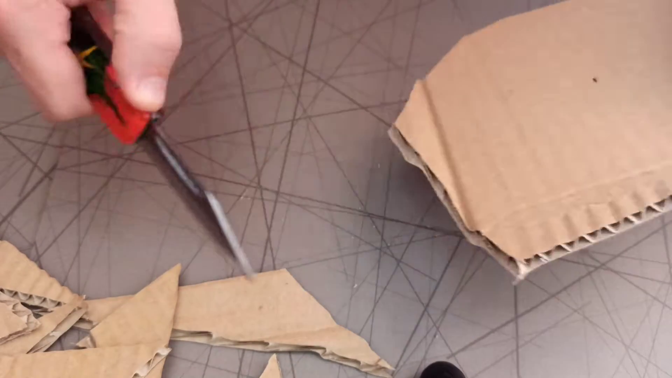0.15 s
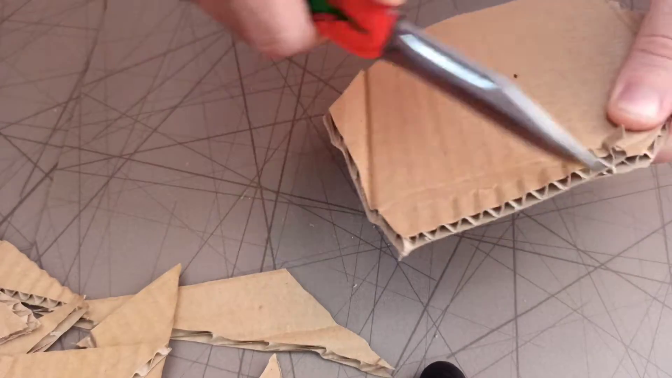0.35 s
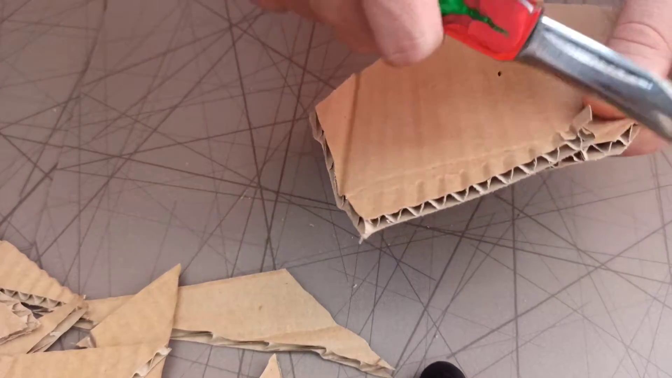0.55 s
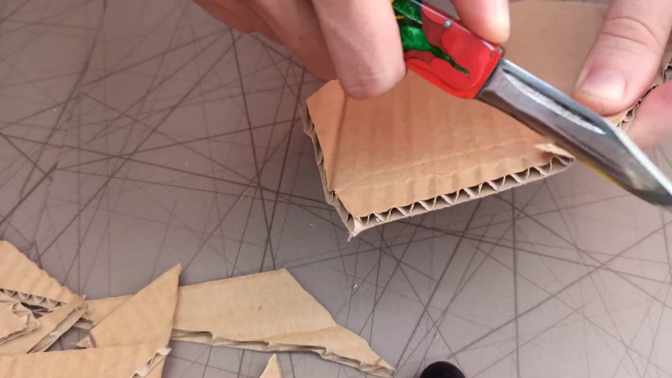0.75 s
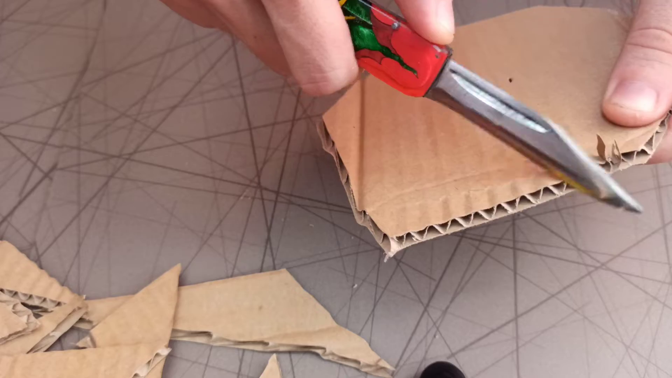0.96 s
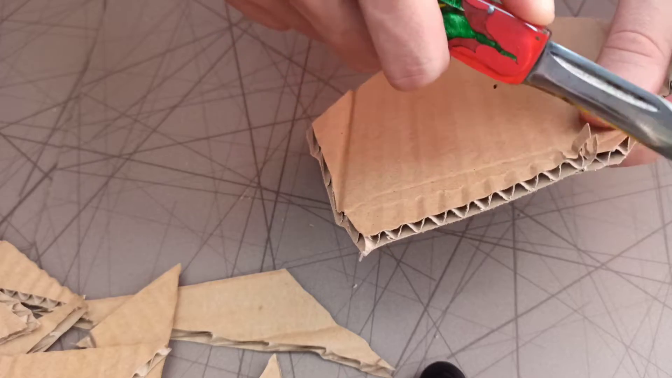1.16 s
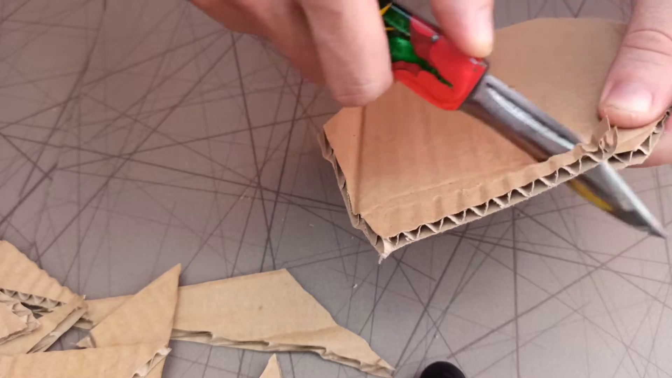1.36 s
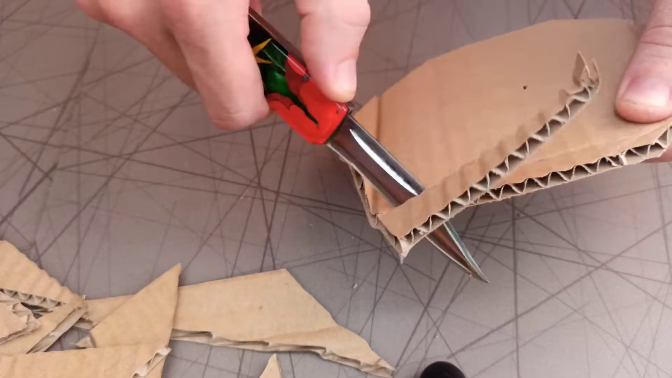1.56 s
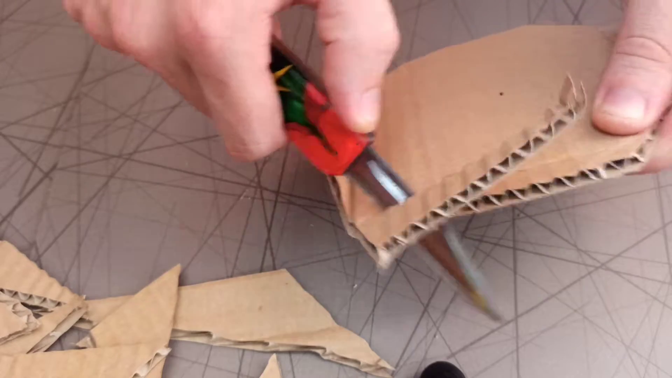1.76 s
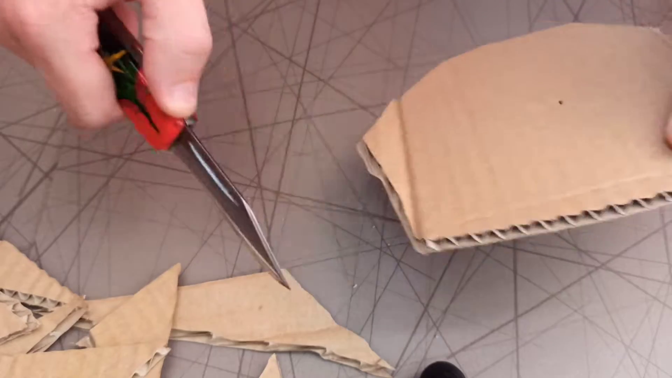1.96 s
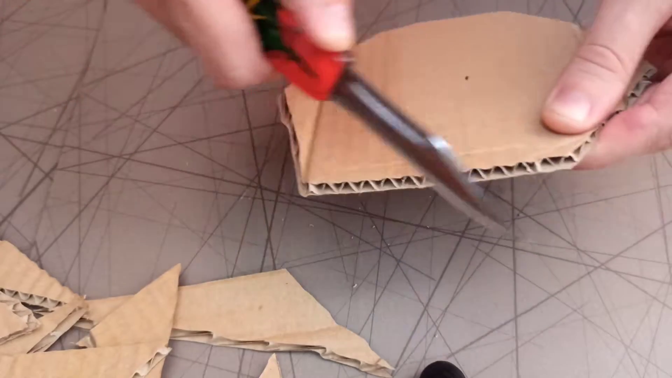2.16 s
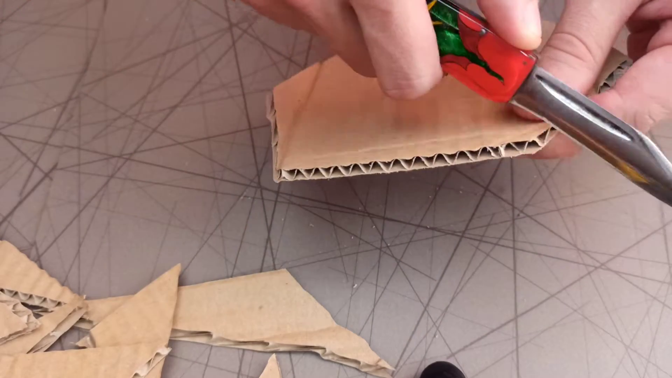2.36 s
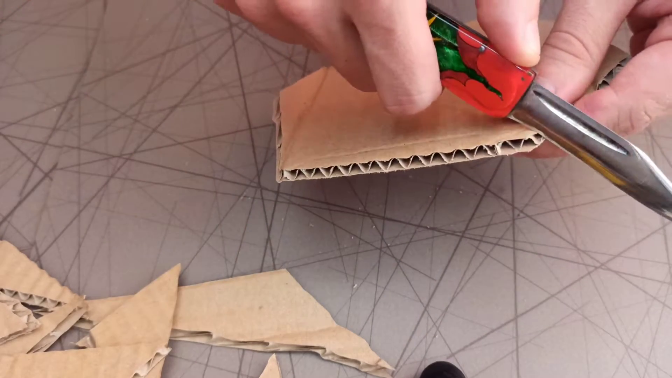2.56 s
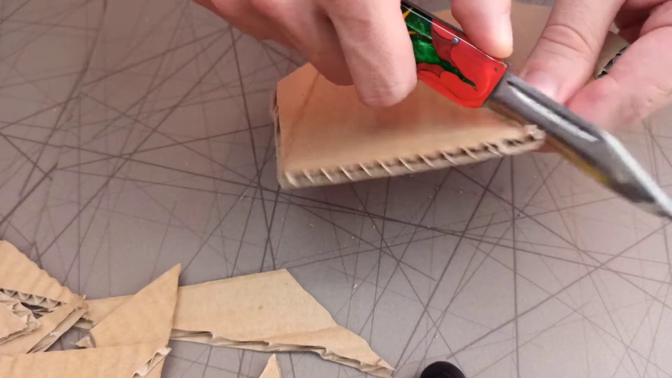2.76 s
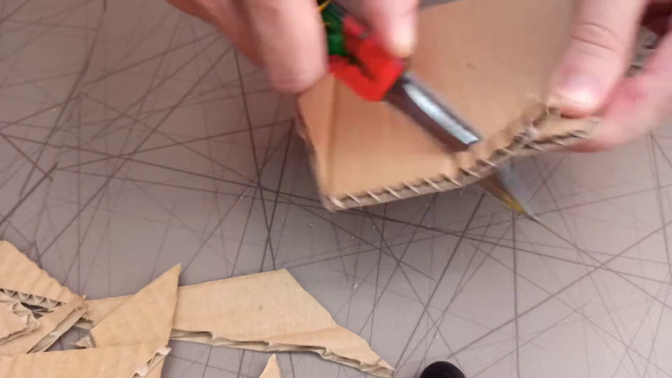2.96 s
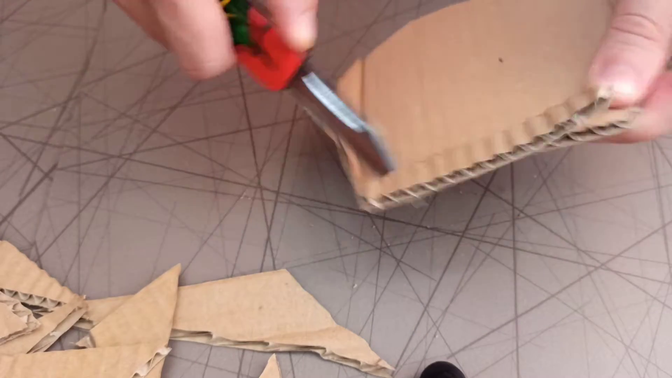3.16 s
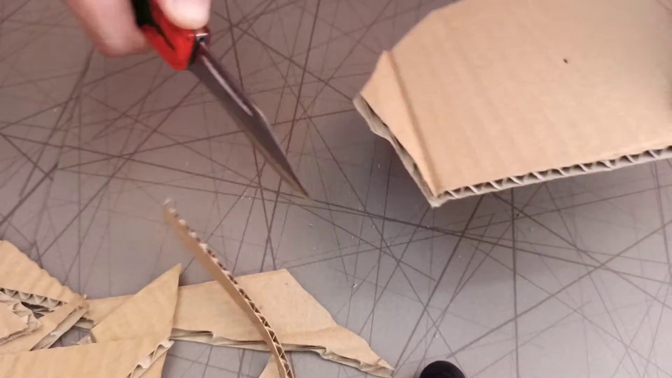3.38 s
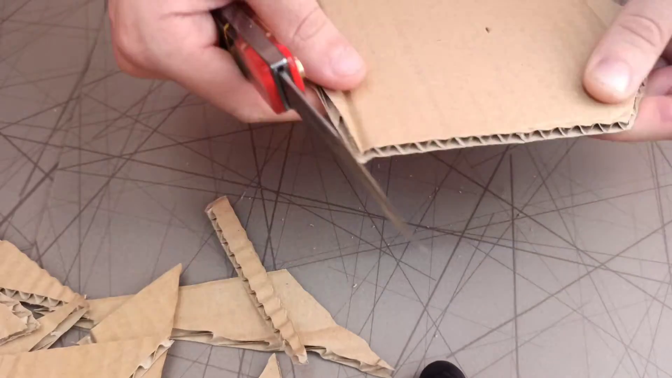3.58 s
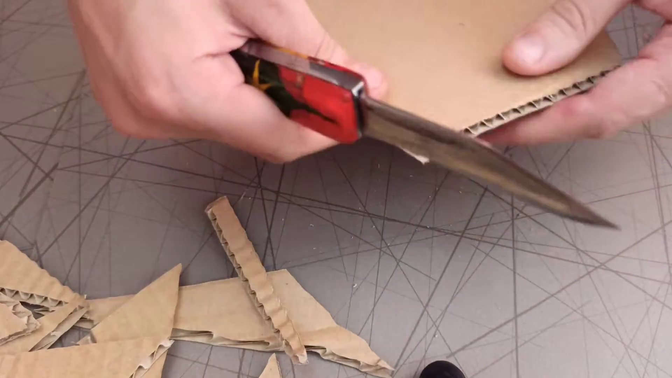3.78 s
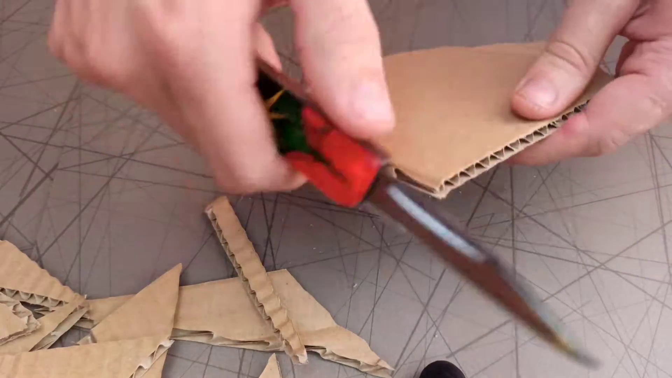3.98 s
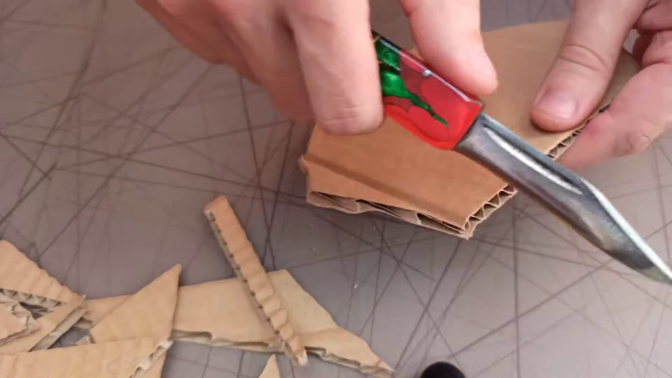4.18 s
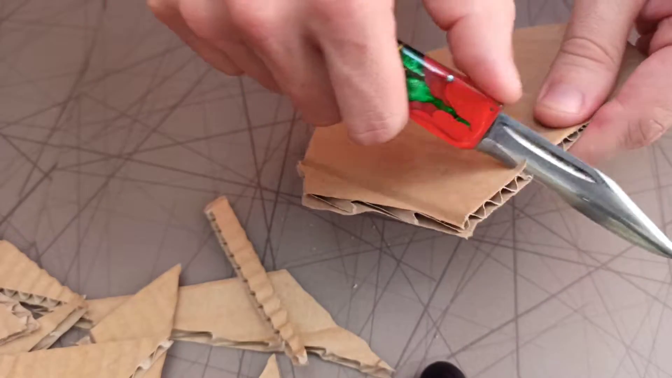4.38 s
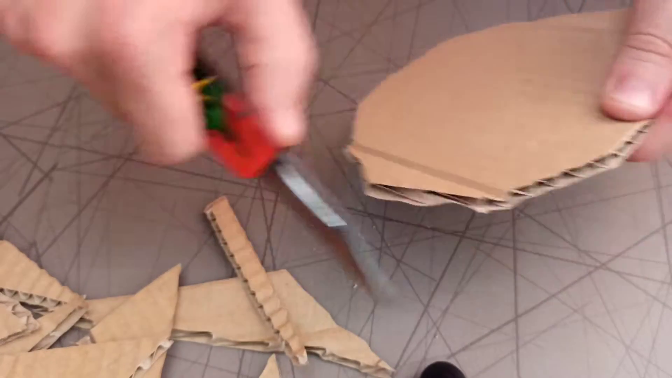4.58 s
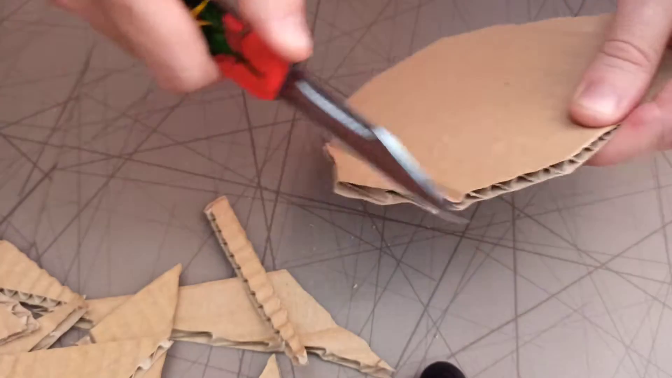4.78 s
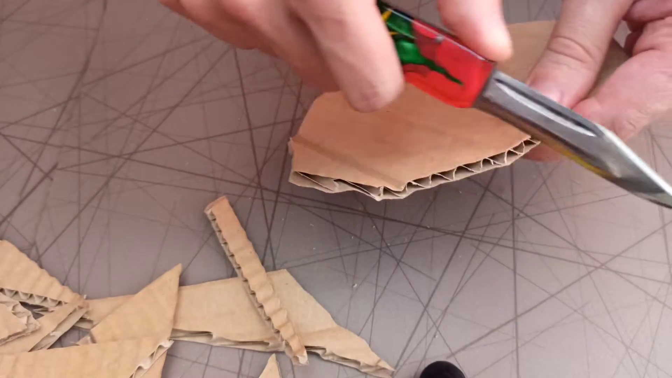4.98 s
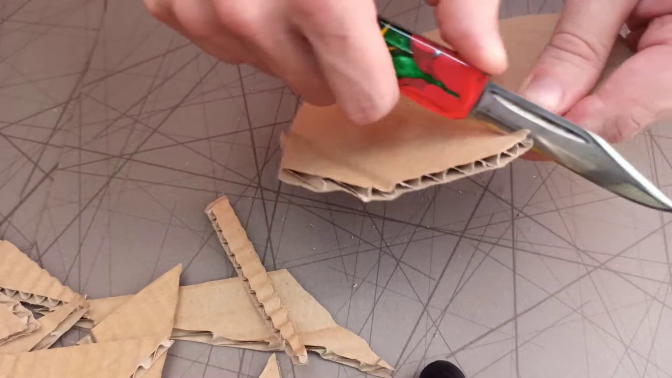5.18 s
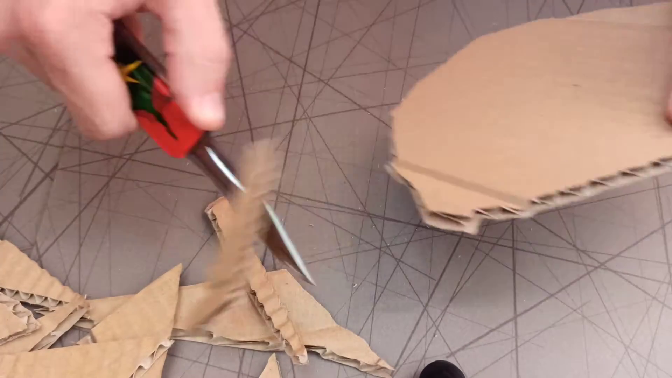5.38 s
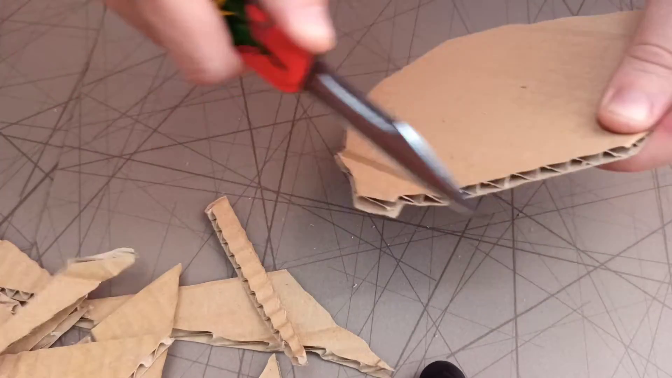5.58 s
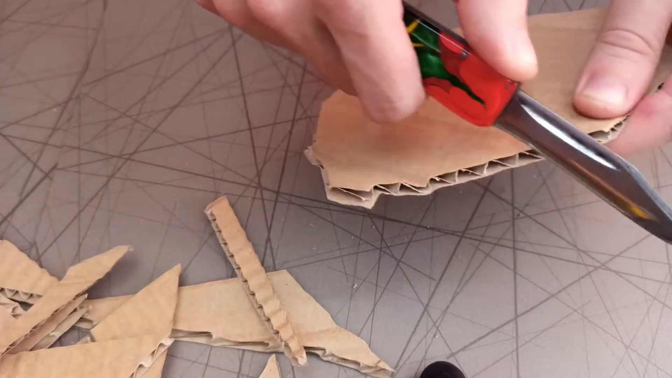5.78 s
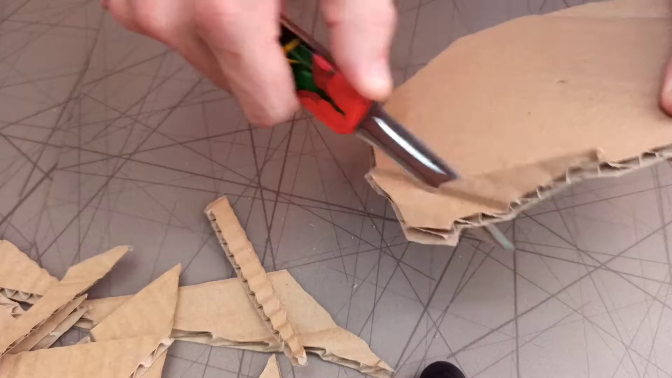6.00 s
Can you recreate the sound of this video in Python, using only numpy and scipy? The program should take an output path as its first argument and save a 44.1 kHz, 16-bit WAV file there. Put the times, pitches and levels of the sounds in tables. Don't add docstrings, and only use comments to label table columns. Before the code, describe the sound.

Cardboard is sliced by hand: dry, crackling rips with brittle pops and low hollow knocks, separated by quiet paper rubs and small ticks. Strokes cluster near the middle and grow longer and crunchier later, the last one still tearing as it ends. The sound is very close and bright with little bass, with short room reflections and a barely audible background hum, thin whine and far engine.

```python
import sys
import numpy as np
from scipy import signal
from scipy.fft import rfft, irfft, next_fast_len
from scipy.io import wavfile
from scipy.ndimage import uniform_filter1d

SR = 44100
rng = np.random.default_rng(int(sys.argv[2]) if len(sys.argv) > 2 else 0)


def bounce(signal):
    frames = np.transpose(np.atleast_2d(signal))
    limited = np.clip(frames, -1, 1)
    pcm = np.round(limited * 32767).astype(np.int16)
    wavfile.write(sys.argv[1], SR, pcm)


def volts_from_db(level):
    exponent = np.asarray(level, float) / 20
    return 10 ** exponent


N = 266364


def evened(x):
    return x / np.sqrt(np.mean(x ** 2) + 1e-20)


def read(points, hz):
    f, value = np.transpose(points)
    return np.interp(np.log(hz + 1), np.log(f + 1), value)


def coloured(x, points):
    size = next_fast_len(N)
    gain = volts_from_db(read(points, np.fft.rfftfreq(size, 1 / SR)))
    return irfft(rfft(x, size) * gain, size)[:N]


def without_bass(x, order, hz):
    return signal.sosfilt(signal.butter(order, hz, "high", fs=SR, output="sos"), x)


def ring(x, hz, width):
    r = np.exp(-np.pi * width / SR)
    return 2 * signal.lfilter([1 - r], [1, -r * np.exp(2j * np.pi * hz / SR)], x).real


def glide(curve, order, waver_db):
    s, hz, db = np.transpose(curve)
    t = np.arange(N) / SR
    waver = evened(uniform_filter1d(rng.standard_normal(N), 6000))
    level = np.sqrt(2) * volts_from_db(np.interp(t, s, db) + waver_db * waver)
    turns = order * np.cumsum(np.interp(t, s, hz)) / SR
    return level * np.sin(2 * np.pi * turns)


# start_s, pitch_hz, level_db (rms)
DRONE = [
    (0, 51, -78),
    (2.5, 48.5, -79),
    (2.9, 48, -84),
    (3.7, 48, -80),
    (4.1, 54, -72),
    (4.5, 57, -71),
    (4.75, 61, -71),
    (5.1, 53, -72),
    (5.4, 50, -84),
    (6.04, 50, -92),
]
# start_s, pitch_hz, level_db (rms)
WHINE = [(0, 4352, -81), (.5, 4348, -80), (1.3, 4350, -81), (2.3, 4362, -88), (3.7, 4355, -91),
         (4.2, 4355, -84), (5, 4352, -83), (6.04, 4350, -82)]


def machines():
    engine = glide(DRONE, order=1, waver_db=5.5) + volts_from_db(-1) * glide(DRONE, order=2, waver_db=-0.5)
    return engine + glide(WHINE, order=1, waver_db=1.5)


# pitch_hz, level_db
AIR = [(30, -30.5), (60, -8), (105, 1), (250, -7), (600, -11), (1200, -19), (2000, -25.5), (4500, -28),
       (7000, -23.5), (11000, -43), (16000, -35.5)]
# pitch_hz, level_db (rms)
HUM = [(624.5, -67.5)]


def air():
    t = np.arange(N) / SR
    out = volts_from_db(-62.5) * evened(coloured(rng.standard_normal(N), AIR))
    for hz, db in HUM:
        waver = evened(uniform_filter1d(rng.standard_normal(N), 9000))
        out += volts_from_db(db + 0.5 + 1.5 * waver) * np.sin(2 * np.pi * hz * t + 0.17 * waver)
    return out


# pitch_hz, t60_s
ROOM = [(200, 0.054), (800, 0.17), (2000, .18), (6000, 0.17), (14000, 0.12)]


def room(x):
    taps = np.zeros(SR // 2)
    at = np.arange(120, len(taps) - 20, 20)
    taps[at + rng.integers(0, 20, len(at))] = rng.choice([-1., 1.], len(at))
    hz, t, z = signal.stft(taps, SR, nperseg=256)
    t60 = np.clip(read(ROOM, hz), .03, 1)[:, None]
    tail = signal.istft(z * volts_from_db(-60 * t / t60), SR, nperseg=256)[1]
    return signal.oaconvolve(x, tail / np.linalg.norm(tail))[:N]


# start_s, level_db (peak), pitch_hz
THUDS = [(0.049, -39.5, 220), (1.078, -44, 197), (1.446, -50.5, 230), (2.799, -41.5, 244),
         (3.029, -47.5, 158), (3.168, -43.5, 150), (3.517, -42.5, 146), (4.036, -33.5, 216),
         (4.598, -51, 210), (2.97, -39.5, 228), (5.258, -53.5, 224), (5.301, -43, 262), (1.329, -47, 160)]


def thuds():
    out, t = np.zeros(N + 6000), np.arange(6000) / SR
    shape = (1 - np.exp(-t / 0.00046)) * np.exp(-t / 0.016)
    for s, db, hz in THUDS:
        out[round(s * SR):][:len(t)] += volts_from_db(db - 4.0) * shape * np.sin(2 * np.pi * hz * t)
    return out[:N]


# start_s, level_db (peak), pitch_hz
PLUCKS = [(.0585, -26, 640), (1.785, -19, 7730), (.729, -54, 630), (.739, -49, 670), (.7505, -47, 1630),
          (.816, -44, 4100), (1.041, -44, 2380), (1.0488, -47, 2280), (1.304, -51, 685),
          (0.7744, -31.5, 1010), (1.341, -52, 1160), (1.365, -55, 775), (1.391, -61, 1130),
          (1.412, -51, 1150), (1.433, -42, 415), (1.465, -49, 473), (1.602, -45, 1570), (1.6155, -43, 1390),
          (1.626, -43, 1037), (1.66, -44.5, 1300), (1.773, -40, 1080), (1.795, -46.5, 625),
          (1.813, -40.5, 615), (1.9325, -45, 738), (2.6457, -35, 4190), (2.656, -44, 580),
          (2.771, -34, 575), (2.798, -37.5, 3020), (2.804, -30, 766), (2.971, -31, 590),
          (2.981, -25.5, 652), (3.1445, -32, 630), (3.1815, -30, 635), (3.233, -53, 649),
          (3.521, -48, 1250), (3.559, -50.5, 474), (3.5805, -48.5, 1160), (3.862, -39.5, 1040),
          (4.4515, -47, 1400), (4.538, -25.5, 714), (5.249, -26.5, 716), (5.258, -26, 726),
          (5.304, -20, 546), (5.317, -28.5, 570), (5.344, -41, 646), (5.3765, -45.5, 732),
          (5.539, -52, 613), (5.5465, -44.5, 3760), (5.886, -32, 700), (5.911, -26.5, 744),
          (5.914, -24.5, 1550), (5.927, -32, 3725), (5.9343, -28, 3130), (5.949, -27, 840),
          (5.975, -30, 1830), (5.996, -27.5, 705), (6.0198, -32, 3530)]


def plucks():
    rise_s, ring_s, ring_cycles = 0.00043, 0.0026, 1.55
    out, t = np.zeros(N + 2000), np.arange(2000) / SR
    for s, db, hz in PLUCKS:
        shape = (1 - np.exp(-t / rise_s)) * np.exp(-t / (ring_s + ring_cycles / hz))
        out[round(s * SR):][:len(t)] += volts_from_db(db) * shape / shape.max() * np.sin(2 * np.pi * hz * t)
    return out[:N]


# start_s, level_db (peak), pitch_hz
KNOCKS = [(.0455, -9.5, 560), (.0458, -20.5, 1550), (.0488, -21, 730), (.0385, -28, 900),
          (3.8222, -24, 720), (4.0324, -17.5, 680), (4.0328, -21.5, 2500), (4.0326, -20, 4100),
          (2.9519, -10.5, 6700), (2.9422, -19.5, 1250), (2.9522, -23, 1200), (5.2342, -22, 3000),
          (5.298, -19, 3300), (2.9114, -13.5, 6600), (.7603, -19.5, 706), (3.141, -17, 7300),
          (3.1462, -14.5, 7400), (3.1455, -22, 800), (3.1635, -18, 7400), (1.7922, -18, 7600),
          (1.796, -21.5, 7600), (4.5098, -12.5, 6700), (2.012, -41, 6800), (2.0203, -46, 6300),
          (1.9355, -39, 3650)]


def knocks():
    swell_s, swell_cycles = 0.00051, .35
    out, t = np.zeros(N + 800), np.arange(800) / SR
    for s, db, hz in KNOCKS:
        u = t / (swell_s + swell_cycles / hz)
        out[round(s * SR):][:len(t)] -= volts_from_db(db) * (u * np.exp(1 - u)) ** 3 * np.sin(2 * np.pi * hz * t)
    return without_bass(out[:N], 2, 200)


def body(x, modes):
    return evened(sum((-1) ** k * volts_from_db(db) * ring(x, hz, w) for k, (hz, w, db) in enumerate(modes)))


def walls(drive, low_hz, high_hz, width, wander_db, count):
    hz = np.geomspace(low_hz, high_hz, count) * rng.uniform(0.8844, 1.04, count)
    near = rng.standard_normal((count, N // 64 + 1))
    near = uniform_filter1d(uniform_filter1d(near, 12, axis=1), 12, axis=1)
    near = np.repeat(volts_from_db(wander_db * evened(near)), 64, axis=1)[:, :N]
    return evened(sum(ring(ring(drive * g, f, width), f, width) for f, g in zip(hz, near)))


# pitch_hz, level_db
TEAR = [(4000, -15.5), (4700, -1.5), (6000, 4.5), (6700, -0.5), (7600, 0.5), (8400, 0), (11000, -16),
        (11600, -36)]
# pitch_hz, width_hz, level_db
FLUTES = [(1365, 38, 5), (2334, 200, 7), (3330, 1100, -1), (4460, 216, 9)]
# pitch_hz, width_hz, level_db
BOARD = [(450, 10, -0.5), (635, 36.5, 4.5), (870, 520, -9.5)]


def voices(drive):
    tear = evened(coloured(drive, TEAR)) + .7 * walls(drive, 6800, 8400, 300, 4, count=7)
    flute = body(drive, FLUTES) + .7 * walls(drive, 1100, 4300, 260, 3.2, count=12)
    board = body(drive, BOARD) + .8 * walls(drive, 360, 900, 100, 2.5, count=6)
    board = without_bass(board, 3, 280)
    fine = signal.sosfilt(signal.butter(8, 11400, "high", fs=SR, output="sos"), drive)
    return np.array([evened(v) for v in (tear, flute, board, fine)])


def breaks(events, rise, fall, ring_s, knock_s, fine_db):
    tear, flute, board, fine = voices(rng.standard_normal(N))
    out, t = np.zeros(N + 3000), np.arange(3000) / SR
    onset = 1 - np.exp(-t / rise)
    burst = onset * (np.exp(-t / fall) + 0.18 * np.exp(-t / .007))
    burst /= burst.max()
    swing = (1 - np.exp(-t / (rise + 0.00046))) * np.exp(-t / knock_s)
    for s, db, flute_db, knock_db, knock_hz, flute_hz in events:
        at = round(s * SR)
        here = np.minimum(at + np.arange(len(t)), N - 1)
        tone = onset * np.exp(-t / ring_s) * np.sin(2 * np.pi * flute_hz * t)
        ping = .45 * burst * flute[here] + .8 * tone
        upper = np.exp(-t / 0.0029) * np.sin(2 * np.pi * 1.776 * knock_hz * t)
        knock = swing * (np.sin(2 * np.pi * knock_hz * t) + upper + 0.41 * board[here])
        crack = burst * (tear[here] + volts_from_db(fine_db) * fine[here])
        sound = crack + volts_from_db(flute_db) * ping + volts_from_db(knock_db + 6.5) * knock
        out[at:at + len(t)] += volts_from_db(db) * sound
    return out[:N]


def walled(rows):
    board_knock_hz = 704
    return [(*row[:4], board_knock_hz, row[4]) for row in rows]


def faced(rows):
    face_flute_hz = 1522
    return [(*row, face_flute_hz) for row in rows]


# start_s, level_db (peak), flute_ring_db, flute_pitch_hz
TICKS = [(1.9336, -35, 4, 3600), (2.111, -24, -8, 3640), (3.344, -29.5, -5.5, 4000),
         (3.3517, -29.5, 1.5, 4420), (3.407, -39, 0.5, 4020), (3.5615, -35, -5, 4530),
         (3.928, -38.5, -4, 4140), (3.9535, -42, -3, 4600), (4.0328, -17, -2, 4090), (4.0716, -32, 2, 4150),
         (4.5992, -25.5, -7, 3830), (4.6952, -43, -12, 3900), (4.8353, -41.5, 0, 3000),
         (4.8435, -33.5, -2, 2600), (4.874, -36, -1.5, 3370), (4.902, -43.5, -7, 3930),
         (4.914, -43, -25, 4300), (5.001, -41, -20, 4600), (5.009, -54, -10, 4360),
         (5.05, -51.5, -10, 4400), (5.3767, -28.5, -26, 4700), (5.411, -29, -7, 4050),
         (5.54, -41.5, 4.5, 3980), (0.7398, -35, -17, 3880), (.7517, -41, -12, 4000),
         (0.8536, -45, -12, 4000), (1.4995, -42, -13, 4170), (2.235, -58, -17, 4020),
         (2.409, -56.5, -24, 4000), (2.7257, -39, -15, 4200), (3.168, -24, -14, 4330),
         (3.192, -38, -15, 4300), (3.933, -42, -6, 4250), (4.341, -41.5, -12, 4100),
         (4.453, -41, -12, 4100), (5.496, -56, -15, 4300), (5.826, -43.5, -15, 4000),
         (5.862, -46, -11, 4030), (5.882, -26, -20, 4090), (5.889, -20, -24, 4090), (2.756, -21, -16, 4250),
         (2.982, -17.5, -9, 4150), (3.1386, -16, -6, 2300)]


def ticks():
    light = [(s, db, flute_db, -np.inf, 0, hz) for s, db, flute_db, hz in TICKS]
    return breaks(light, rise=0.00008, fall=0.0014, ring_s=0.0027, knock_s=1, fine_db=-16.0)


# start_s, level_db (peak), flute_ring_db, board_knock_db, knock_pitch_hz
CREASES = [(0.7723, -33, 9, -3, 620), (.823, -35, 3, 5.5, 450), (.987, -52, -10, 13, 762),
           (1.036, -44, 8, -8, 960), (1.0552, -36.5, 3, 5.5, 454), (1.454, -60, -17, 15, 450),
           (1.7347, -45.5, -19, 8, 450), (2.042, -50, -23, -10, 420), (5.833, -31.5, -3, -28, 628),
           (1.345, -58, -11, 14, 407), (1.418, -60, -23, 14, 450), (1.44, -53, -32, 0, 430),
           (1.612, -51, -9, 11.5, 378), (1.765, -45.5, -15, 9.5, 423), (1.815, -57, -18.5, 3, 516),
           (2.945, -33.5, -3, 7.5, 412), (4.035, -28, 0, -0.5, 339), (4.368, -54, -6, 11, 430),
           (4.548, -36.5, -15, 10.5, 450), (5.122, -49, -11, 8, 401), (5.139, -47.5, -5.5, 8.5, 400),
           (.0435, -26, 3, 5.5, 381), (5.3035, -33.5, -17, 10.5, 405), (3.826, -45, -12, 7, 700),
           (.826, -47.5, 0, 6.5, 910), (2.37, -71, -10, 7, 790), (2.46, -66, -9, 9, 597)]


def creases():
    return breaks(faced(CREASES), rise=0.00033, fall=0.0072, ring_s=0.0015, knock_s=0.0063, fine_db=-20.0)


# start_s, level_db (peak), flute_ring_db, board_knock_db, flute_pitch_hz
CRUSHES = [(1.5705, -41, -26, -29, 4040), (1.783, -16.5, -6, -13.5, 4460), (1.793, -22, -20, -27.5, 3500),
           (1.789, -29, -27, -37, 3300), (1.948, -35.5, -1, -29, 3370), (2.007, -50.5, -22, -22, 3280),
           (3.4715, -43.5, -13, -17, 3700), (4.509, -14.5, -15.5, -21, 1360), (4.517, -20.5, 1, -5.5, 1390),
           (4.535, -17, 0, -14, 3820), (4.540, -12.5, -7.5, -24, 4120), (5.2645, -12, -14.5, -22, 3210),
           (5.274, -18, 2, -27.5, 3530), (5.28, -26.5, -1, -8, 2620), (5.296, -11.5, -9, -41, 3080),
           (5.302, -15.5, -21, -2.5, 3390), (5.943, -13, -3, -15, 2880), (5.9655, -14.5, -2, -29, 3530),
           (3.122, -28.5, -9, -35, 4250), (5.928, -12.5, -5.5, -25, 3660), (5.957, -21, 1, -22, 3470),
           (5.999, -20.5, 0.5, -30, 3150), (2.776, -24, -16, -29, 4320), (2.8, -30, -21, -31, 2990),
           (5.912, -23.5, -9, -30, 3170)]


def crushes():
    return breaks(walled(CRUSHES), rise=.0022, fall=0.0035, ring_s=0.004, knock_s=0.0043, fine_db=-12.5)


# start_s, level_db (peak), flute_ring_db, board_knock_db, knock_pitch_hz
TAPS = [(0.0462, -17, -6, -20, 597), (.602, -53, 2, 3, 450), (0.712, -37, 3, -3, 1180),
        (.7603, -25, -2, -8, 677), (1.6034, -57, 3, 11, 1170), (1.616, -64, 10, 9.5, 410),
        (1.626, -44, 8, 6.5, 455), (1.635, -56, -10, 17, 583), (1.673, -64, 3, 7.5, 960),
        (1.743, -54, -12, 6.5, 430), (.98, -46, 3, 2.5, 697), (1.656, -56, 7, 14.5, 635),
        (1.7068, -60, 10, 7.5, 640), (2.7891, -18.5, -9, -14, 694), (2.9619, -26, 2, 0.5, 660),
        (3.1694, -26.5, 2.5, -0.5, 614), (3.307, -45, -12.5, -11, 960), (3.515, -41.5, -5.5, -1.5, 440),
        (4.0345, -17, -4.5, -16.5, 590), (4.297, -49.5, 1.5, -1.5, 407), (4.383, -28.5, -2, -16, 710),
        (4.481, -32, 2.5, -14.5, 440), (1.402, -61, 10, 2, 800), (1.51, -58, 0, 3, 450),
        (5.272, -36.5, -1.5, -1.5, 420), (5.328, -42, -6, 0.5, 420), (5.8145, -39, 3.5, 3, 750)]
# start_s, level_db (peak), flute_ring_db, board_knock_db, flute_pitch_hz
SNAPS = [(.0247, -26, 5.5, -21, 4260), (4.5, -16, -4, -28, 1390), (2.6457, -21, -17, -23, 4500),
         (2.7407, -38, -17, -6, 4640), (2.770, -16, -6.5, -36, 4100), (2.9119, -13.5, -13, -28.5, 4120),
         (2.9422, -16.5, -4, -22, 4400), (2.9519, -19, 2, -45, 4350), (3.1105, -16.5, -10, -27, 4300),
         (3.1362, -13.5, -7, -13, 2110), (3.1466, -26, 7, -18, 2040), (3.1567, -17, -4.5, -19, 2110),
         (3.5801, -45, -20, -21, 4290), (3.8224, -31, -3.5, -5, 4290), (4.4693, -29, -8.5, -9, 2230),
         (5.1183, -44, -6, -16, 3740), (5.2172, -21, -16, -16, 1900), (5.2345, -11.5, -5, -46, 4600),
         (5.2487, -11.5, -10, -39, 3700)]


def snaps_and_taps():
    events = walled(SNAPS) + faced(TAPS)
    return breaks(events, rise=.0001, fall=0.00097, ring_s=0.0036, knock_s=0.0042, fine_db=-14)


def cracks():
    slow = crushes() + creases()
    return without_bass(volts_from_db(-2.0) * snaps_and_taps() + volts_from_db(-5.5) * slow + volts_from_db(-3.5) * ticks(), 2, 230)


def fibres(push, per_s, spread_db, clump_db, pops_per_s, pop_db):
    size = volts_from_db(spread_db * np.minimum(rng.exponential(1, N), 5)) * (rng.random(N) < per_s / SR)
    clumps = evened(uniform_filter1d(uniform_filter1d(rng.standard_normal(N), 150), 150))
    pops = (rng.random(N) < pops_per_s / SR) * rng.uniform(0.8, 1, N)
    pops = signal.lfilter([1], [1, -np.exp(-1 / (0.00064 * SR))], pops)
    strength = volts_from_db(clump_db * push * clumps) + volts_from_db(pop_db) * push * pops
    return evened(size * rng.choice([-1., 1.], N) * strength)


def stroke(t, top_s, rise, hold, tear_db, flute_db, board_db, sag, release):
    onset_db = -33.5
    end, end_db = top_s + hold, -sag * hold
    shape_s = [top_s - rise, top_s, end, end + 1]
    db = tear_db + np.interp(t, shape_s, [onset_db, 0, end_db, end_db - release], -200)
    early = np.clip(1 - (t - top_s) / (hold + 0.095), 0, 1)
    ring_db = db + flute_db + 0.5 * early
    low_db = db + board_db - 8 * early
    fine_db = db - 12 - 0.072 * flute_db
    return volts_from_db(np.array([db, ring_db, low_db, fine_db]))


# full_touch_s, hold_s, tearing_db, flute_ring_db, board_ring_db
RUBS = [(0.609, 0.11, -66.5, -8, 1), (0.724, .03, -53.5, 3, -1), (0.756, 0.12, -54.5, -4, -7),
        (2.611, 0.017, -58, -3, -21), (2.881, .025, -50, -14, -9), (3.056, 0.033, -56, -10, 0),
        (0.965, 0.088, -59, -13, 7), (1.298, 0.19, -56.5, -3.5, 7), (1.452, 0.066, -54, -27, -12),
        (1.569, 0.065, -48, -13.5, -10.5), (1.655, 0.07, -61.5, -5.5, 9), (1.953, 0.1, -64.5, -6, -6),
        (2.124, 0.068, -69, -1, -12), (2.645, 0.03, -44.5, -12.5, -28), (3.459, 0.011, -58, -15, -25.5),
        (3.517, 0.051, -52.5, -6, -1), (3.583, 0.058, -54, -8, -25), (3.904, 0.037, -54, -5.5, -1),
        (4.637, 0.041, -64, -11.5, -15.5), (4.835, 0.14, -69, -34, 0.5), (5.443, 0.044, -61.5, -8.5, -23),
        (5.535, 0.015, -55.5, -1, -21.5), (3.116, .008, -53, -17, -9), (5.83, 0.046, -48.5, -11, -1),
        (2.047, 0.022, -72, 1, -3), (2.244, .15, -81.5, -3.5, 19), (2.516, 0.017, -72, -15, -13),
        (1.037, 0.0093, -63, 0, -7), (4.456, 0.0084, -52, -16, -1), (0.851, 0.024, -54, -2, -8),
        (1.004, .04, -69.5, 7, -10), (1.397, .12, -73.5, -9, 3)]
# full_push_s, rise_s, hold_s, tearing_db, board_ring_db (against tearing)
CUTS = [(0.033, 0.07, .008, -35.5, 1.5), (0.024, .001, 0.006, -28, -12), (0.76, 0.0012, .004, -47.5, 14),
        (1.773, 0.1, 0.0054, -48, 4), (1.773, 0.022, 0.0062, -30.5, -51),
        (2.106, 0.00067, 0.00085, -59.5, -18), (2.755, 0.047, 0.033, -33.5, -15),
        (2.911, 0.0048, 0.057, -28, -6), (3.11, 0.0055, 0.056, -29, -3.5), (3.348, 0.0018, 0.0027, -44, -7),
        (3.773, .002, .001, -55.5, 1), (3.819, 0.004, 0.0016, -38.5, -8), (4.037, 0.039, 0.0032, -39, 2.5),
        (4.359, 0.048, 0.0079, -37.5, -10), (4.471, 0.013, 0.049, -29, -3.5),
        (5.118, 0.022, 0.02, -38, -12), (5.223, 0.017, 0.072, -26.5, -8.5),
        (5.407, 0.0026, 0.00075, -53.5, -25), (5.546, .01, .006, -46, -18.5),
        (5.902, 0.045, 0.084, -26.5, -8)]


def strokes():
    t = np.arange(0, N + 32, 32) / SR
    cut = rub = 0
    for s, rise, hold, db, board_db in CUTS:
        flute_db = -9 + 0.12 * board_db
        cut = cut + stroke(t, s, rise, hold, db, flute_db, board_db, sag=-44.5, release=339.5) ** 2
    for s, hold, db, flute_db, board_db in RUBS:
        rub = rub + stroke(t, s, 0.023, hold, db, flute_db, board_db, sag=40.5, release=270) ** 2
    gains = np.repeat(np.sqrt([cut, rub]), 32, axis=2)[..., :N]
    cut, rub = uniform_filter1d(gains, 60, axis=2)
    level_db = uniform_filter1d(20 * np.log10(cut[0] + rub[0] + 1e-5), 900)
    fall_db_s = -np.gradient(level_db) * SR
    push = np.clip(1 - (fall_db_s - 120) / 150, .15, 1)
    torn = fibres(push, per_s=8000, spread_db=2.8, clump_db=1.2, pops_per_s=130, pop_db=1.5)
    rubbed = fibres(push, per_s=4500, spread_db=3.0, clump_db=2.6, pops_per_s=60, pop_db=4.0)
    return (cut * voices(torn) + rub * voices(rubbed)).sum(0)


def scene():
    struck = cracks() + plucks() + knocks()
    torn = strokes()
    echo = room(volts_from_db(-11.5) * struck + volts_from_db(-34.5) * torn)
    return (torn + struck + thuds() + echo + air() + machines())[None]


def band_limit(x):
    return signal.sosfilt(signal.butter(12, 16970, fs=SR, output="sos"), x)


STEP_HZ = [4760, 6120, 8540, 11600, 15760]
STEP_DB = [-9.5, -8.5, 7, -47.5]


def record(dry):
    dip_db, gap_db, top_db, off_db = STEP_DB
    gains_db = np.array([0, dip_db, 0, gap_db, top_db, off_db])
    size = next_fast_len(N)
    hz = np.fft.rfftfreq(size, 1 / SR)
    gain = uniform_filter1d(volts_from_db(gains_db[np.searchsorted(STEP_HZ, hz)]), 300)
    gain *= 1 - 1.2 * np.exp(-((hz - 11050) / 70) ** 2)
    gain /= np.sqrt(1 + (46 / (hz + 1)) ** 10)
    mix = irfft(rfft(dry, size) * gain, size)[:, :N]
    return band_limit(mix)


dry = scene()
out = record(dry)
bounce(out)
```